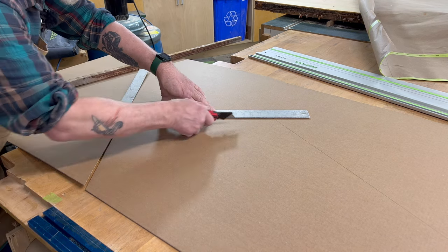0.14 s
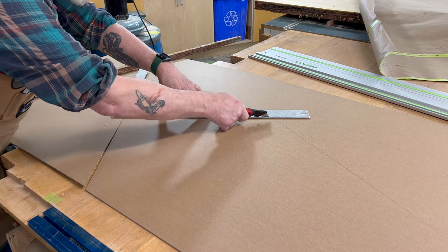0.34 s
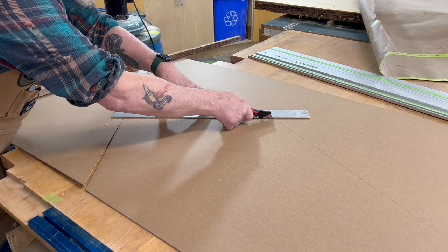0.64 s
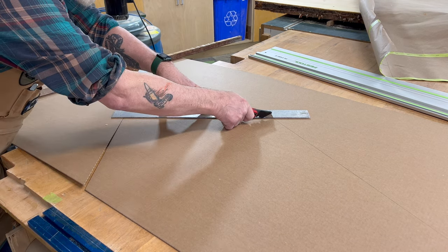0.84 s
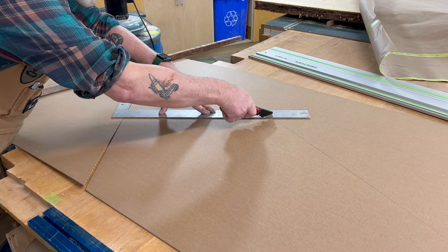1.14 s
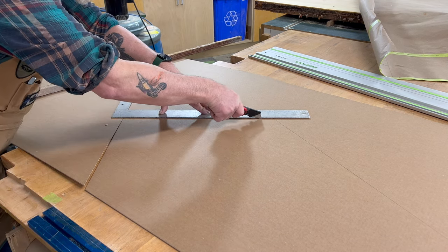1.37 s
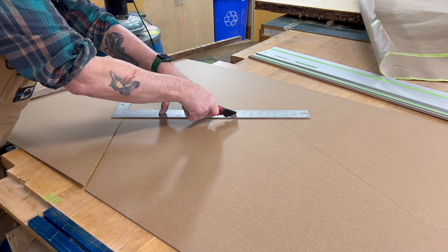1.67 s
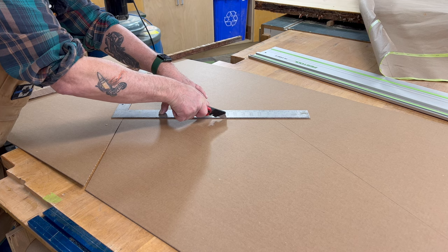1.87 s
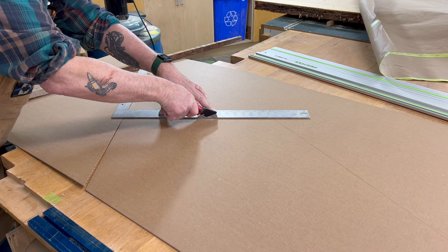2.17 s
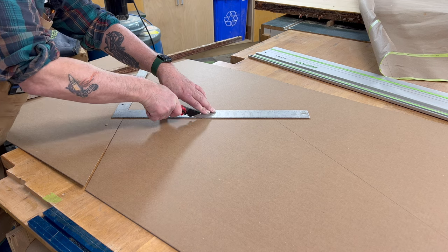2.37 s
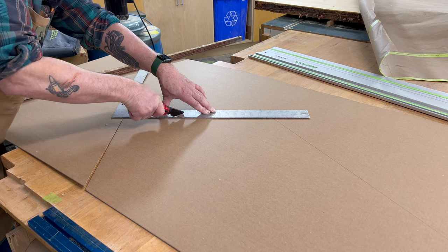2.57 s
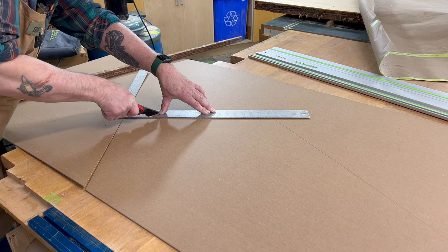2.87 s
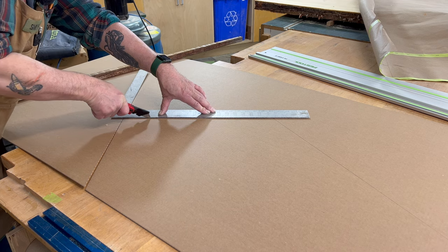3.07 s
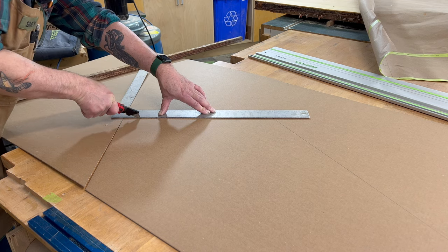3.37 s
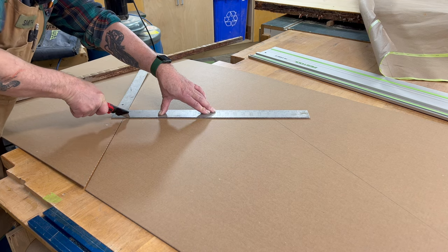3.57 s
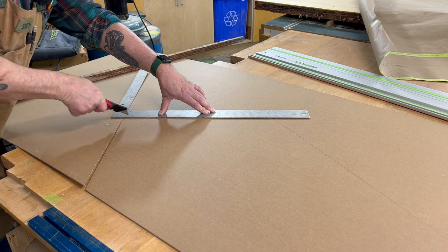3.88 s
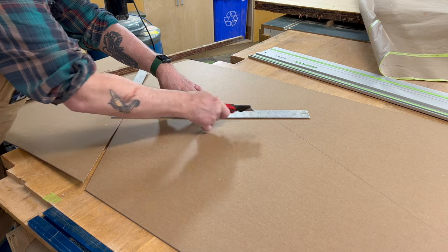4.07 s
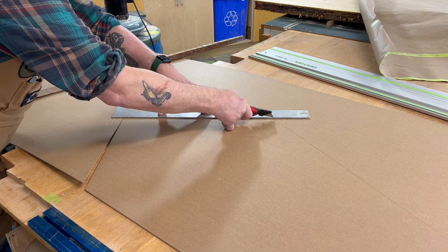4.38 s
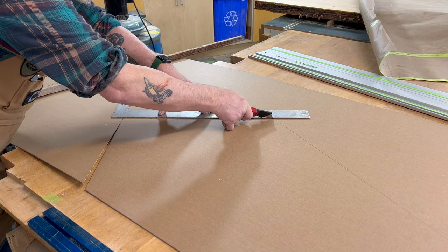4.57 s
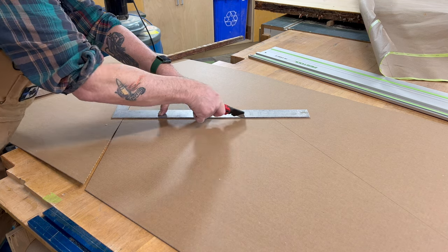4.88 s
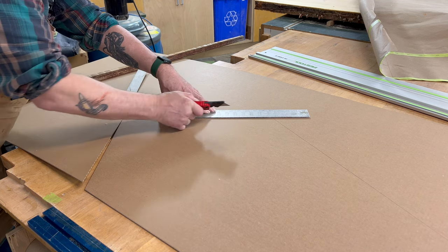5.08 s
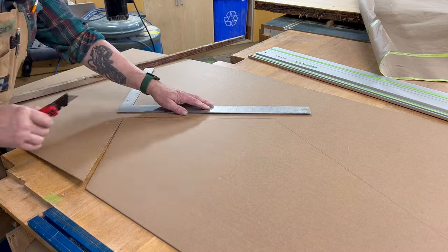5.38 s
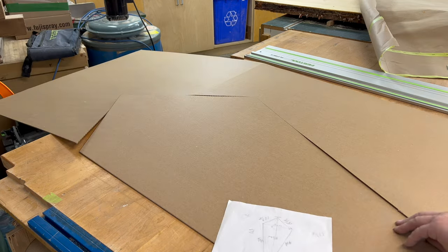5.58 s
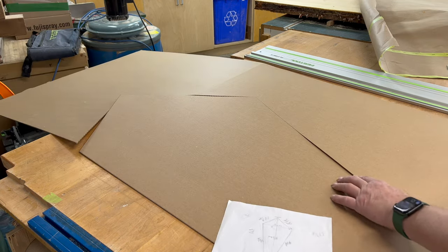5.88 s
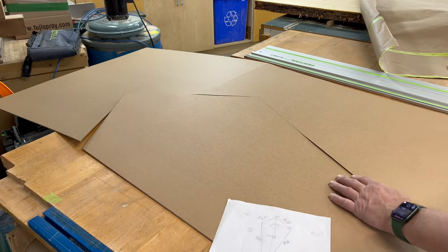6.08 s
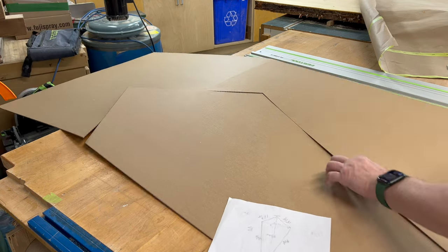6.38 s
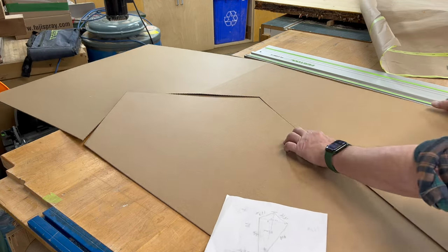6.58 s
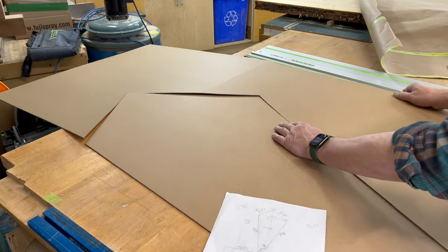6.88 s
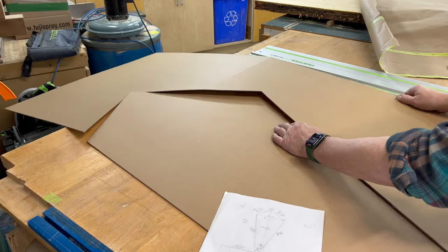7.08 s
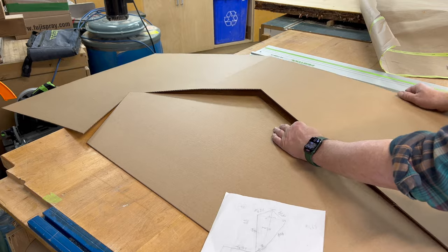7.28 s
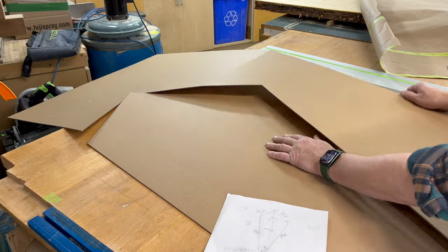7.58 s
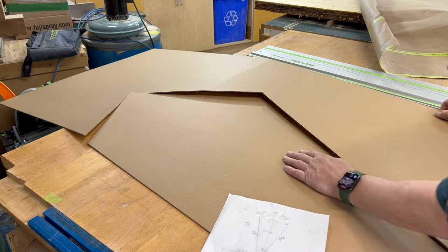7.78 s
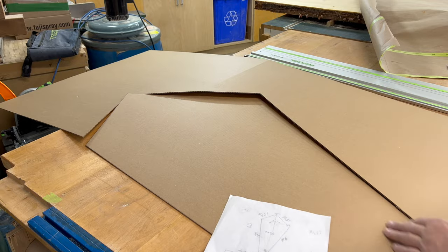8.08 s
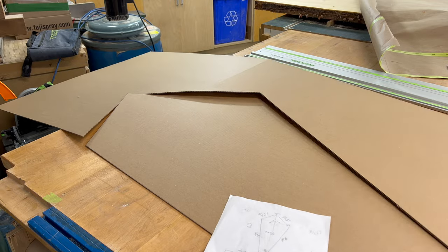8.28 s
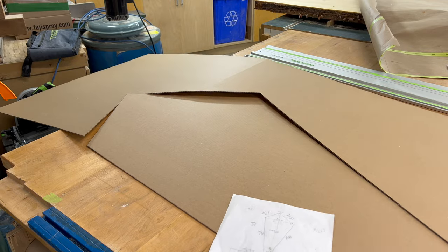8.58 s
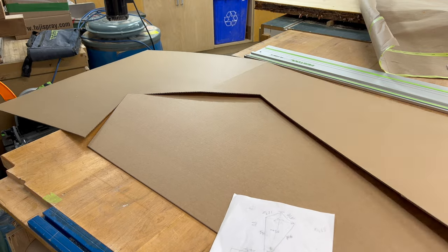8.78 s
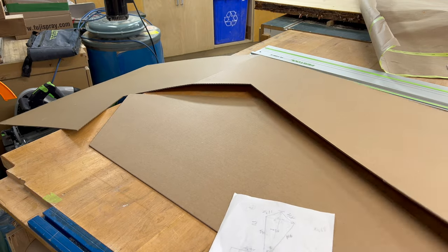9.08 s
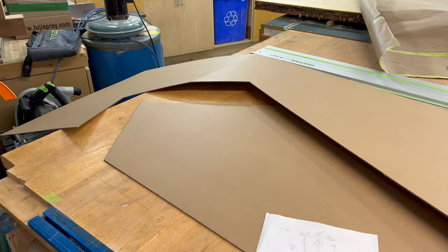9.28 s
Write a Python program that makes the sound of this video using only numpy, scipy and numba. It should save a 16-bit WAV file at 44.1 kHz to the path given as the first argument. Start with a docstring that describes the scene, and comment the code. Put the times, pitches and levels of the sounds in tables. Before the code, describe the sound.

In a small workshop, a blade makes faint, gritty strokes along a steel rule, hissing with a thin metallic ring over low sheet rumble and tiny ticks. After five seconds, hands rub and slide the big cardboard sheet much louder, with a brief near-silent gap. Remaining fibres crack, hollow knocks cluster around seven and a half seconds, and an edge creaks downward. Close microphone, short dull room tail, faint steady air.

```python
"""On a workshop bench a knife is drawn in strokes through cardboard along a steel rule, then hands slide,
lift and flex the big sheet. Tearing fibres are grainy noise that rings blade, rule and sheet resonances.
Sliding card is hiss, scrape and sheet rumble in swells. Uncut bridges snap as noise bursts and thump the
sheet; an edge creaks as grit through a gliding resonance. A short room tail and steady shop air surround it."""
import sys
import numpy as np
from scipy import signal
from scipy.fft import rfft, irfft, next_fast_len
from scipy.io import wavfile
from scipy.ndimage import uniform_filter1d
from numba import njit

SR = 44100
rng = np.random.default_rng(int(sys.argv[2]) if len(sys.argv) > 2 else 0)


def put_to_file(sound):
    """Save the sound as 16-bit audio at rate SR, in the file named by the first command-line argument."""
    columns = np.atleast_2d(sound).T  # one column per channel
    safe = np.clip(columns, -1, 1)
    whole_steps = np.round(safe * 32767)
    wavfile.write(sys.argv[1], SR, whole_steps.astype(np.int16))


N = 416304
TIME = np.arange(N) / SR
STEP = 64  # samples between updates of slow controls
SLOW = TIME[::STEP]

# Knife strokes. Each row: start in s, length in s, initial hiss level in dB, initial sheet rumble level in dB,
# hiss fade over the stroke in dB, rumble centre in Hz, blade ring gain in dB, initial blade whistle in Hz.
KNIFE_STROKES = [(0.0, 0.14, -70, -66, 1, 380, -4, 8700), (0.21, 0.26, -62, -57.5, -8, 305, -1, 9000),
                 (1.186, 0.65, -63, -64, -2, 780, 1, 8100), (2.016, 0.15, -67.5, -71, -3, 863, 0.5, 8950),
                 (2.204, 0.82, -65.5, -67.5, 0.5, 870, 4.5, 9130),
                 (3.214, 0.54, -62.5, -67, 0, 774, -1.5, 10400),
                 (3.801, 0.22, -59, -61.5, 0, 456, 6.5, 7500),
                 (4.132, 0.41, -59.5, -63.5, -13, 495, -4, 9300),
                 (4.677, 0.3, -65.5, -60.5, 3.5, 289, 1.5, 10500)]
# Sheet, palms and sleeve sliding. Each row: peak in s, rise in s, fall in s, peak hiss level in dB,
# peak sheet rumble level in dB, lower hiss gain in dB (rough card above 0, smooth skin below).
SLIDE_SWELLS = [(0.169, 0.033, 0.11, -56.5, -61.5, -18), (0.945, 0.033, 0.036, -76, -69.5, -20),
                (4.06, 0.21, 0.19, -68, -57, 7), (5.12, 0.035, 0.23, -57, -82, -7),
                (5.236, 0.024, 0.059, -47, -57, 1.5), (5.283, 0.035, 0.041, -45, -41.5, 7),
                (5.51, 0.087, 0.96, -53, -62, 1.5), (5.676, 0.05, 0.034, -49.5, -70, -10),
                (5.81, 0.12, 0.15, -52.5, -87, -5), (5.959, 0.016, 0.017, -50, -52, 3),
                (6.109, 0.034, 0.029, -56, -55, 4.5), (6.337, 0.034, 0.06, -52, -44, -7),
                (6.435, 0.05, 0.061, -53.5, -52.5, -1.5), (6.57, 0.17, 0.15, -47.5, -59, 0.5),
                (6.69, 0.11, 0.13, -59.5, -52, -1), (6.856, 0.094, 0.13, -46.5, -52.5, 0),
                (7.02, 0.11, 0.092, -50.5, -44.5, -1), (7.25, 0.044, 0.17, -64, -45, 5.5),
                (7.4, 0.1, 0.28, -54, -52.5, 3), (7.56, 0.15, 0.3, -60, -44, -7),
                (7.755, 0.096, 0.1, -50, -70, 1.5), (7.98, 0.31, 0.11, -54, -58, 0),
                (8.16, 0.089, 0.12, -44.5, -76, -3.5), (8.61, 0.048, 0.078, -53.5, -59, 5.5),
                (8.72, 0.12, 0.2, -56.5, -78, -1), (8.96, 0.017, 0.036, -59.5, -74, 7),
                (9.09, 0.18, 0.15, -63.5, -52.5, 4), (9.22, 0.12, 0.068, -53, -80, -1.5)]
# Small ticks and bumps, during cutting and later handling. Each row: time in s, crack drive before its
# band-pass in dB, thump drive in dB, thump centre in Hz.
SMALL_TICKS = [(0.0573, -45, -56, 1110), (0.293, -38.5, -53, 470), (0.41, -34.5, -47.5, 760),
               (0.54, -55, -59.5, 810), (0.638, -59, -56, 900), (0.6536, -45, -55, 690),
               (0.7206, -44, -55.5, 700), (0.775, -54, -66, 754), (0.842, -52, -63, 805),
               (1.0539, -47.5, -55, 304), (1.1574, -44.5, -55.5, 453), (1.2392, -33, -45, 1370),
               (3.0762, -54.5, -59.5, 460), (4.1614, -48, -49, 1040), (4.373, -70, -57, 334),
               (5.022, -50, -72, 900), (8.404, -43, -54, 900), (8.851, -43, -58, 900)]
# Fibres snap, sheet knocks. Each row: time in s, crack drive before its band-pass in dB, thump drive in dB,
# brighter spit drive before its band-pass and 4 dB lift in dB, thump centre in Hz.
FIBRE_SNAPS = [(5.1467, -47, -42, -69, 308), (5.1772, -63, -45, -63, 294), (5.661, -43, -49, -46, 468),
               (5.9479, -63, -44, -65.5, 577), (5.9656, -38.5, -45, -43, 573),
               (6.0226, -36, -40.5, -42, 880), (6.1561, -32.5, -38, -25.5, 647),
               (6.1737, -33, -41.5, -29.5, 415), (6.25, -36.5, -46, -43, 696),
               (6.2798, -30.5, -36, -62, 540), (6.3304, -53, -39, -31.5, 550),
               (6.623, -38.5, -40, -26.5, 1120), (6.7321, -40, -37.5, -41, 662),
               (6.7534, -24, -32.5, -40, 443), (6.982, -19.5, -22, -40, 640),
               (7.0111, -16.5, -53, -19.5, 401), (7.0253, -30, -26.5, -25, 463),
               (7.0469, -20, -53, -30, 537), (7.0704, -23, -26, -50, 486), (7.224, -28.5, -35, -61, 302),
               (7.24, -37, -50, -48, 616), (7.3135, -26.5, -27, -69, 510),
               (7.462, -7.5, -16.5, -19.5, 1070), (7.4745, -19, -14.5, -26, 850),
               (7.5211, -19, -31, -51, 320), (7.538, -26, -29, -45, 470), (7.5789, -31, -28, -39, 850),
               (7.619, -38, -29, -50, 697), (7.6292, -24.5, -32.5, -34, 734),
               (7.6355, -20.5, -30, -56, 306), (7.939, -36, -41, -63, 715),
               (8.0553, -33.5, -42.5, -38.5, 686), (8.4158, -33, -35.5, -42, 990),
               (8.4585, -34, -76, -38.5, 283), (8.4784, -39, -73, -44, 934), (8.6036, -37, -51, -34, 700),
               (8.7531, -23, -13, -26, 1470), (8.7673, -13, -32, -24.5, 320),
               (8.8589, -39, -37.5, -47, 700), (9.2792, -31.5, -37.5, -45, 760),
               (9.3778, -51, -42.5, -67, 1700)]
# An edge creaks over card or bench, one list per creak. Each row: time in s, pitch in Hz, tone level in dB.
EDGE_CREAKS = [
    [(3.15, 800, -78), (3.23, 870, -68), (3.5, 776, -71.5)],
    [(5.24, 575, -78), (5.29, 385, -43), (5.33, 315, -58)],
    [(8.155, 840, -50), (8.197, 805, -34), (8.212, 428, -38), (8.26, 235, -43)],
]
# Blade modes. Each row: nominal centre in Hz, relative gain in dB.
BLADE_MODES = [(4150, 0), (9900, 4.5)]
# Sheet modes. Each row: nominal centre in Hz, relative drive in dB.
SHEET_MODES = [(130, -3.5), (220, 2.5), (300, 3), (460, 2.5), (650, 2), (800, 2), (960, 1), (1120, 0.5),
               (1340, -1), (1900, -5.5)]
# Spectrum of tearing hiss. Each row: frequency in Hz, relative density in dB per Hz.
CUT_SPECTRUM = [(1060, -6.5), (2200, -12.5), (7270, -8), (9540, -6), (15700, -8)]
# Spectrum of sliding hiss. Each row: frequency in Hz, relative density in dB per Hz.
SLIDE_SPECTRUM = [(2060, -14), (3500, -6.5), (6200, -8), (12500, -1.5), (15700, -4.5)]
# Spectrum of shop air. Each row: frequency in Hz, relative density in dB per Hz.
SHOP_SPECTRUM = [(30, -27.5), (69, -12), (772, -5), (2580, -24.5), (9060, -22.5), (15700, -26)]

BITE_DB_PER_S, LIFT_DB_PER_S = 458, 302  # hiss slopes as a stroke sets in and lets go
RUMBLE_FADE, RUMBLE_LAG = 0.59, 0.88  # share of the fade and of the slopes that the sheet follows
REST_DB = -79.5  # sheet murmur under resting hands
BLADE_Q, BLADE_DB = 13, -3.5  # blade and rule together, against the cut hiss
BLADE_DRIFT, BLADE_WANDER_DB = 0.045, 6  # scale of the slow walks of pitch (as a share) and gain
WHISTLE_DB, WHISTLE_OCT_PER_S = 4, 0.15  # the whistle climbs along a stroke
RULE_HZ, RULE_Q, RULE_DB = np.geomspace(3600, 14000, num=13), 28, 2  # close narrow modes of the steel rule
SHEET_Q = 6.6
HANDLING_S = 4.99  # handling starts
GAP_S, GAP_DB = (5.582, 5.66), -22  # abrupt near-silent gap: sliding sound breaks off and restarts
SWELL_DB = 22  # drop from the peak after one rise or fall time
BED_HISS_DB, BED_RUMBLE_DB = -64, -62.5  # faint bed under the slides
SHAKE_DB, SHAKE_T60_S = -11, 0.13  # rumble left by a knock, against its thump drive
CRACKLE_PER_S, CRACKLE_DB, RATTLE_DB, FLEX_DB = 60, -11.5, -3, -18  # against scrape, sheet drive and rumble
ROOM_T60_S, ROOM_DB, ROOM_HZ = 0.15, -11, 5450
SHOP_DB = -72.5
TOP_HZ = 16400


def knife():
    """The edge tears fibres: broad hiss, drifting blade and rule resonances and a rumble through the sheet."""
    hiss_db, rumble_db, centre_hz, ring_db, whistle_hz = stroke_levels()
    tear = fibres(2.84, 1.7, 60)
    ringing = 0
    for hz, db in [*BLADE_MODES, (whistle_hz, WHISTLE_DB)]:
        gain = held(db + BLADE_WANDER_DB * walk(4.01))
        ringing = ringing + gain * ring(tear, hz * (1 + BLADE_DRIFT * walk(2.53)), BLADE_Q, STEP)
    for hz in RULE_HZ:
        gain = held(RULE_DB + BLADE_WANDER_DB * walk(6))
        ringing = ringing + gain * ring(tear, hz * (1 + BLADE_DRIFT * walk(3)), RULE_Q, STEP)
    hiss = colour(tear, CUT_SPECTRUM) + held(BLADE_DB + ring_db) * unit(ringing)
    body = sheet(fibres(2.6, 1.4, 40), centre_hz, slope_db=1.2, wander_db=2.0)
    return held(hiss_db) * unit(hiss) + held(rumble_db) * unit(body)


def stroke_levels():
    """Bite, fading hold and lift of every stroke: hiss dB, rumble dB, rumble centre Hz, ring dB, whistle Hz."""
    columns = np.transpose(KNIFE_STROKES)[:, :, None]
    start_s, length_s, hiss_db, rumble_db, fade_db, centre_hz, ring_db, whistle_hz = columns
    since_s = SLOW - start_s
    bite_db = BITE_DB_PER_S * np.minimum(since_s, 0)
    lift_db = LIFT_DB_PER_S * np.maximum(since_s - length_s, 0)
    edges_db = bite_db - lift_db
    faded_db = fade_db * np.clip(since_s / length_s, 0, 1)
    hiss = hiss_db + faded_db + edges_db
    rumble = rumble_db + RUMBLE_FADE * faded_db + RUMBLE_LAG * edges_db
    resting = np.where(SLOW < HANDLING_S, REST_DB, -200)
    now = np.argmax(hiss, axis=0)  # loudest stroke sets pitch and ring
    climb = 2 ** (WHISTLE_OCT_PER_S * np.clip(since_s, 0, length_s))
    whistle = np.choose(now, whistle_hz * climb)
    return summed(hiss), summed([*rumble, resting]), centre_hz[now, 0], ring_db[now, 0], whistle


def fibres(spread_db, flicker_db, rate_hz):
    """Dense tearing grains of very unequal size whose strength flickers."""
    grains = rng.standard_normal(N) * undb(spread_db * rng.exponential(size=N))
    return grains * held(flicker_db * walk(rate_hz))


def sheet(drive, centre_hz, slope_db, wander_db):
    """The sheet's modes: those near the centre ring most, each coupled more or less as the contact moves."""
    out = 0
    for hz, db in SHEET_MODES:
        near_db = -slope_db * np.log2(hz / centre_hz) ** 2
        push = drive * held(db + near_db + wander_db * walk(5.5))
        # neighbouring modes move in opposite senses
        out = -out + ring(push, hz * (1 + 0.085 * walk(3)), SHEET_Q, STEP)
    return band(band(out, 70, 5600), 60, 12000)


def slides():
    """Card on card and skin on card: airy hiss, sheet rumble, and a scrape that needs both speed and pressure."""
    hiss, rumble, lower = map(held, slide_levels())
    rub = fibres(2.4, 2.2, 70)
    airy = colour(rub, SLIDE_SPECTRUM)
    # rough patches fill the lower hiss in and out
    airy = airy + (lower * held(0.44 * walk(16)) - 1) * band(airy, 1900, 7700)
    # hollows under the hands colour the hiss in shifting patches
    patches = 0
    for hz in (5200, 8000, 12000):
        patches = patches + held(4 * walk(18)) * ring(airy, hz * 2 ** (0.3 * walk(10)), 5, STEP)
    airy = unit(airy + patches)
    snags = crackle()  # heard as clicks and as small rattles of the sheet
    rasp = held(-14 + 3 * walk(30)) * unit(band(rub, 1700, 8600))
    clicks = undb(CRACKLE_DB) * unit(band(snags, 1700, 13000))
    scrape = np.sqrt(hiss * rumble) * (rasp + clicks)
    drive = unit(fibres(2.0, 2.56, 45)) + undb(RATTLE_DB) * snags
    body = sheet(drive, 600 * 2 ** (0.076 * walk(8.9)), slope_db=0.63, wander_db=3.0)
    # the whole sheet bends and pushes air
    flex = undb(FLEX_DB) * unit(band(rng.standard_normal(N), 90, 228))
    return hiss * airy + scrape + rumble * (unit(body) + flex)


def slide_levels():
    """Rounded swells over a faint bed; each knock leaves the sheet shaking: hiss, rumble and lower hiss dB."""
    peak_s, rise_s, fall_s, hiss_db, rumble_db, lower_db = np.transpose(SLIDE_SWELLS)[:, :, None]
    gap_start_s, gap_end_s = GAP_S
    swell_db = -SWELL_DB * ((SLOW - peak_s) / np.where(SLOW < peak_s, rise_s, fall_s)) ** 2
    # swells that peak before the gap do not return after it
    swell_db = np.where((peak_s < gap_start_s) & (SLOW > gap_end_s), -200, swell_db)
    bed_db = np.where(SLOW > HANDLING_S, 0, -200)
    knock_s, thump_db = np.transpose(FIBRE_SNAPS)[[0, 2], :, None]
    shake_db = thump_db + SHAKE_DB - 60 * (SLOW - knock_s) / SHAKE_T60_S
    shake_db = np.where(SLOW > knock_s, shake_db, -200)
    dip_db = np.where((SLOW > gap_start_s) & (SLOW < gap_end_s), GAP_DB, 0)
    hiss = summed([*(hiss_db + swell_db), BED_HISS_DB + bed_db]) + dip_db
    rumble = summed([*(rumble_db + swell_db), *shake_db, BED_RUMBLE_DB + bed_db]) + dip_db
    # louder slides weigh more
    weights = undb(np.maximum(hiss_db + swell_db, -200))
    lower = np.average(lower_db + 0 * swell_db, axis=0, weights=weights)
    return hiss, rumble, lower


def crackle():
    """Small random fibre snaps of unequal size."""
    when, size = rng.random((int(N / SR * CRACKLE_PER_S), 2)).T
    return unit(bursts(when * TIME[-1], -3.5 * np.log(size + 1e-9), t60_s=0.047))


def snaps():
    """A short crack, a brighter spit and a push that sets the sheet ringing."""
    time_s, crack_db, thump_db, spit_db, centre_hz = np.transpose(FIBRE_SNAPS)
    crack = band(bursts(time_s, crack_db, t60_s=0.014), 1300, 5450)
    # brief, so its front stands above its mean level
    spit = undb(4) * band(bursts(time_s, spit_db, t60_s=0.0091), 6900, 13700)
    return crack + spit + thumps(time_s, thump_db, centre_hz)


def thumps(times_s, db, centre_hz):
    """A blow and a crumpling after it go into the sheet; narrow low modes need a stronger push."""
    latest = np.clip(np.searchsorted(times_s, SLOW + STEP / SR) - 1, 0, None)
    push_db = db + 20 * np.log10(SR / centre_hz)
    drive = kicks(times_s, push_db + 0.5) + bursts(times_s, push_db - 27.5, t60_s=0.07)
    return sheet(drive, centre_hz[latest], slope_db=4.9, wander_db=0.96)


def ticks():
    """Small broad clicks of band-passed noise with a faint thump."""
    time_s, crack_db, thump_db, centre_hz = np.transpose(SMALL_TICKS)
    crack = band(bursts(time_s, crack_db, t60_s=0.0088), 870, 11400)
    return crack + thumps(time_s, thump_db, centre_hz)


def creaks():
    """Gritty stick-slip into a gliding resonance, with grit spilling upwards."""
    out = 0
    for rows in EDGE_CREAKS:
        grit = fibres(0.86, 3, 150)
        tone = unit(ring(grit, along(rows, column=1, outside=580), 4.6, STEP))
        level = held(along(rows, column=2, outside=-200))
        spill = undb(-17.0) * unit(band(grit, 210, 11500))
        out = out + level * (tone + spill)
    return out


def room(x):
    """Bench and nearby walls answer with a short dull tail of decaying noise."""
    t = TIME[:SR // 2]
    tail = band(rng.standard_normal(len(t)), 120, ROOM_HZ) * 1000 ** (-t / ROOM_T60_S)
    tail = tail * (t > 0.003)
    return x + undb(ROOM_DB) * signal.fftconvolve(x, tail / np.linalg.norm(tail))[:N]


def shop_air():
    """The shop's steady air: coloured noise whose level wanders slightly."""
    return held(SHOP_DB + 2.7 * walk(9)) * colour(rng.standard_normal(N), SHOP_SPECTRUM)


def undb(db):
    """Gain of a level in dB."""
    return 10 ** (np.asarray(db) / 20)


def unit(x):
    """Scale to rms 1."""
    return x / np.sqrt(np.mean(x ** 2))


@njit
def ring(x, hz, q, step):
    """One resonance whose centre moves every step samples, gain 1 at the centre."""
    y = np.empty(len(x))
    band_state, low_state, g, damping = 0., 0., 0., 1 / q
    for i in range(len(x)):
        if i % step == 0:
            g = np.tan(np.pi * hz[i // step] / SR)
        v = (band_state + g * (x[i] - low_state)) / (1 + g * (g + damping))
        band_state = 2 * v - band_state
        low_state = low_state + 2 * g * v
        y[i] = damping * v
    return y


def band(x, lo_hz, hi_hz):
    """Band-pass."""
    sos = signal.butter(2, [lo_hz, min(hi_hz, SR / 2.2)], "band", fs=SR, output="sos")
    return signal.sosfilt(sos, x)


def colour(x, points):
    """Shape a long noise by (Hz, dB) points to rms 1; nothing audible passes above the last."""
    hz, db = np.transpose(points)
    size = next_fast_len(N)
    f = np.fft.rfftfreq(size, 1 / SR) + 1  # keeps the log finite
    gain = undb(np.interp(np.log(f), np.log(hz), db, right=-200))
    return unit(irfft(rfft(x, size) * gain, size)[:N])


def walk(rate_hz):
    """Slow control: random levels held for 1 / rate and slewed twice."""
    k = max(int(SR / STEP / rate_hz), 1)
    levels = rng.standard_normal(len(SLOW))[np.arange(len(SLOW)) // k]
    return uniform_filter1d(uniform_filter1d(levels, k), k)


def held(db):
    """Gain at every sample from a slow control in dB."""
    return np.repeat(undb(db), STEP)[:N]


def along(rows, column, outside):
    """One column of a table as a slow control."""
    rows = np.array(rows)
    return np.interp(SLOW, rows[:, 0], rows[:, column], left=outside, right=outside)


def summed(db_rows):
    """Level of overlapping sounds by power sum, dB."""
    return 10 * np.log10(np.sum(10 ** (np.asarray(db_rows) / 10), axis=0) + 1e-20)


def kicks(times_s, db):
    """Single-sample blows over a negligible floor."""
    out = np.full(N, 1e-12)
    np.add.at(out, (times_s * SR).astype(int), undb(db))
    return out


def bursts(times_s, db, t60_s):
    """Noise bursts with a sharp front of envelope level db, falling 60 dB over t60_s."""
    envelope = signal.lfilter([1], [1, -1000 ** (-1 / (t60_s * SR))], kicks(times_s, db))
    return envelope * rng.standard_normal(N)


def scene():
    """Knife and slides, with snaps, ticks and creaks in the room, over the shop's steady air."""
    return (knife() + slides() + room(snaps() + ticks() + creaks()) + shop_air())[None]


def record(dry):
    """The microphone chain cuts the top with a steep low-pass."""
    return signal.sosfilt(signal.ellip(8, 0.2, 70, TOP_HZ, fs=SR, output="sos"), dry)


dry = scene()
out = record(dry)
put_to_file(out)
```